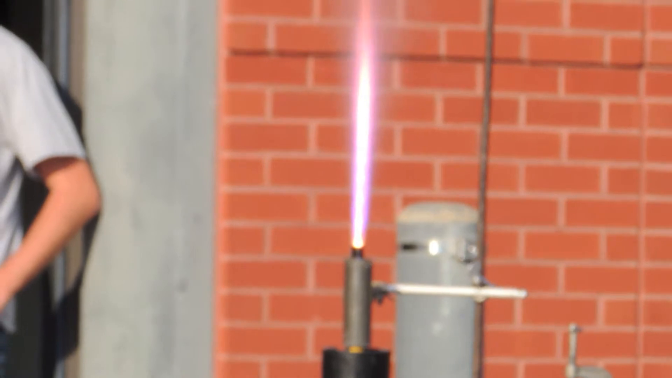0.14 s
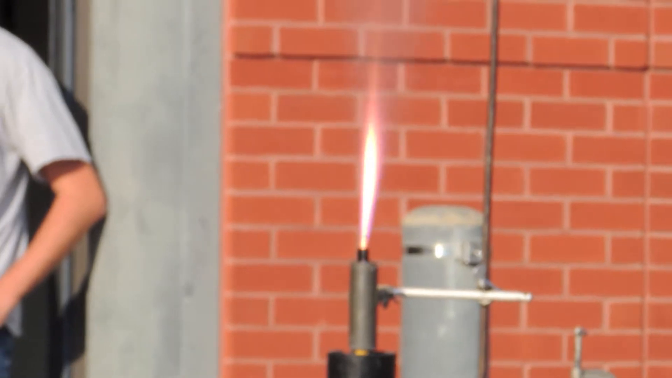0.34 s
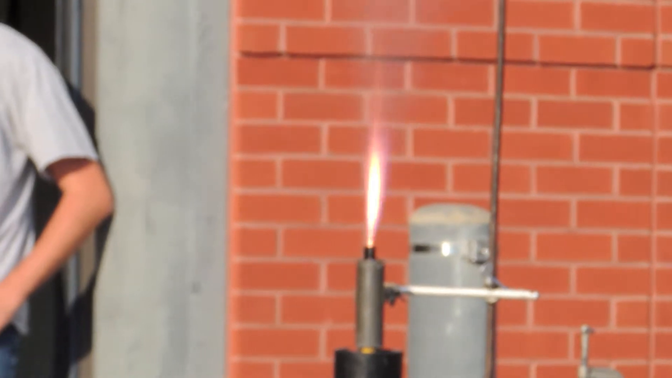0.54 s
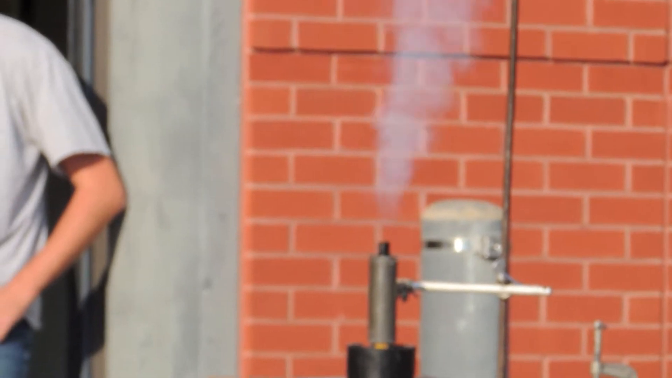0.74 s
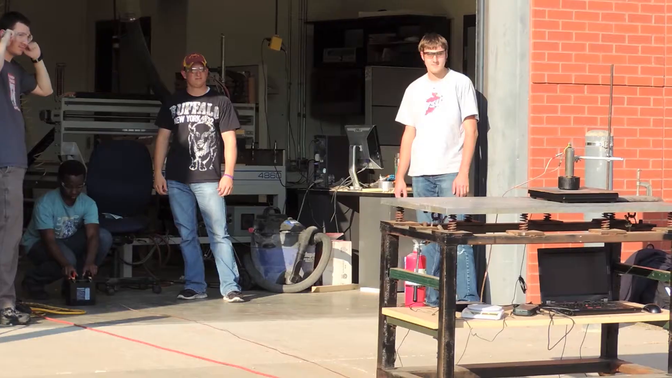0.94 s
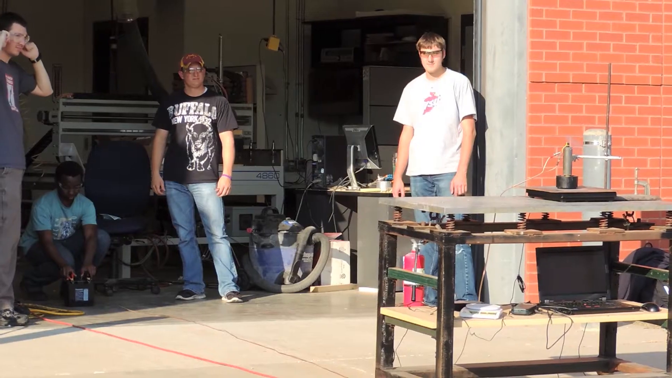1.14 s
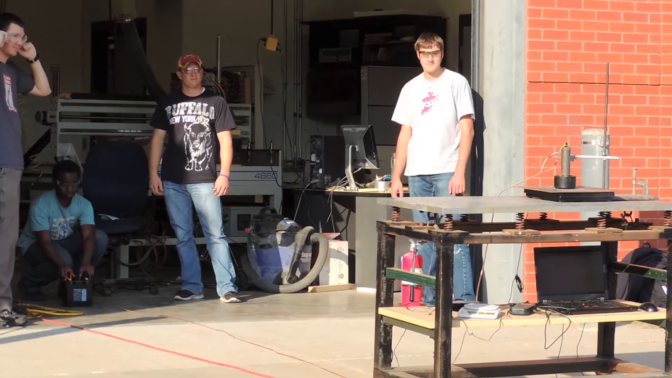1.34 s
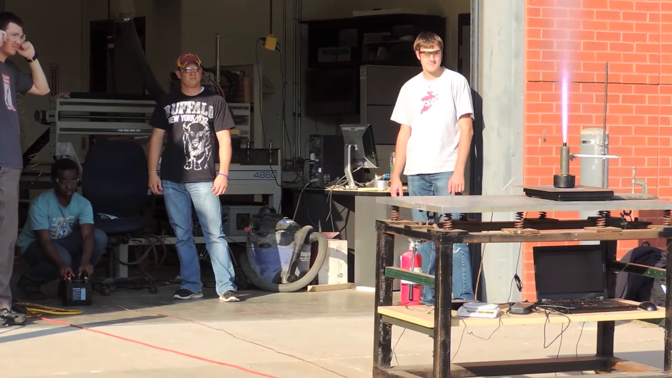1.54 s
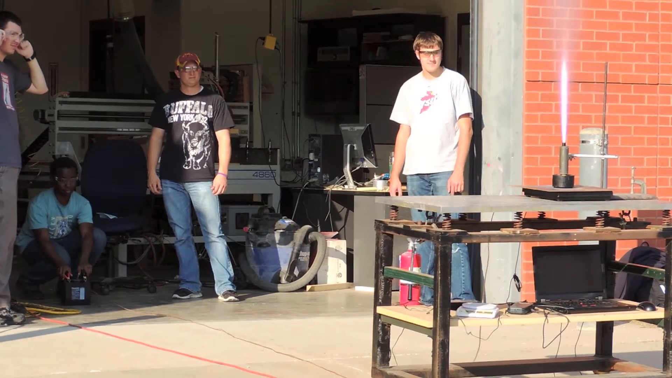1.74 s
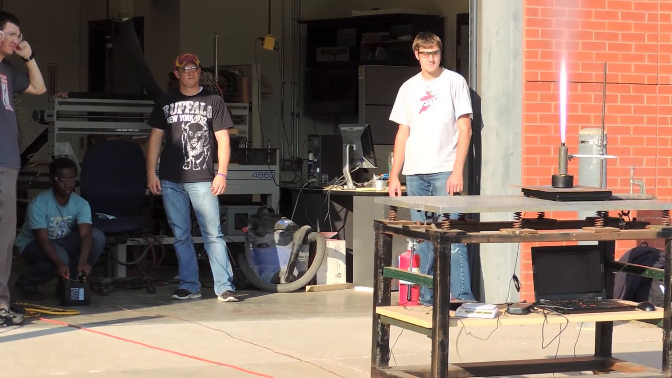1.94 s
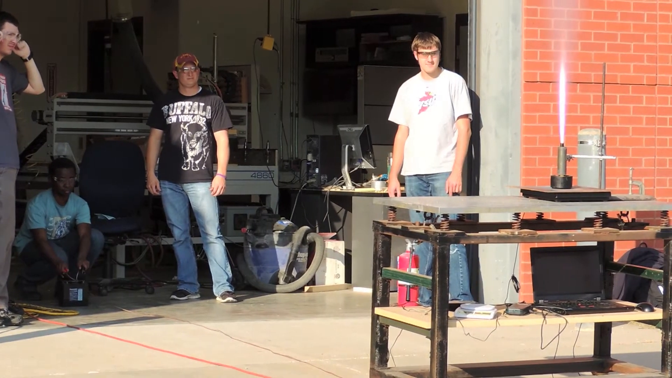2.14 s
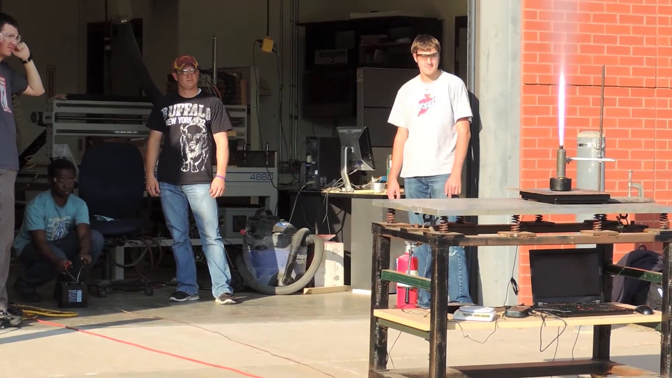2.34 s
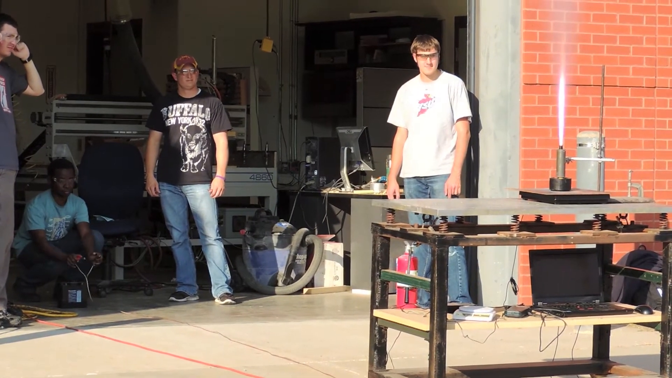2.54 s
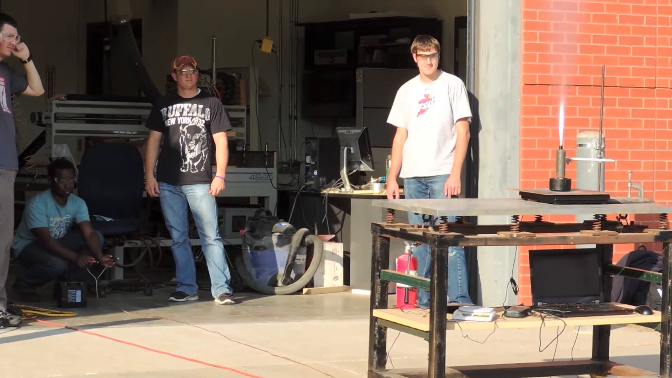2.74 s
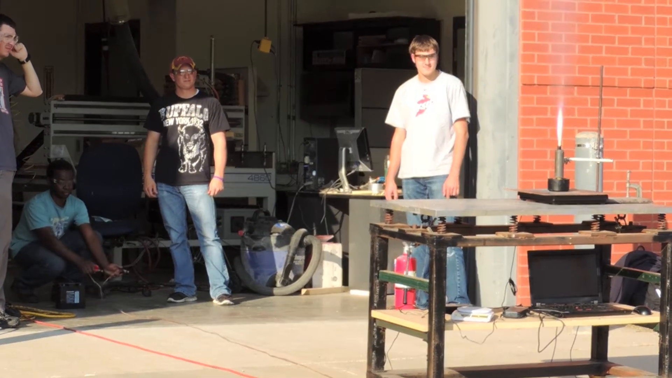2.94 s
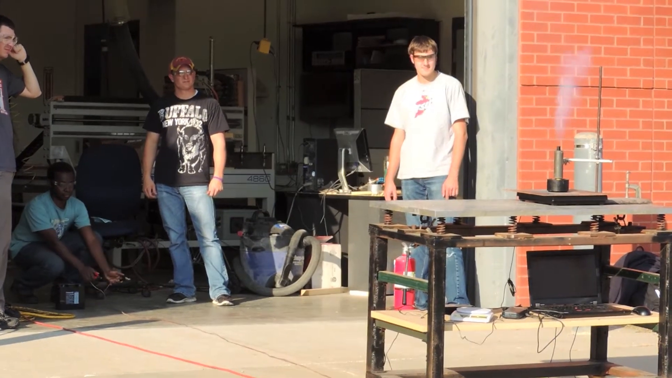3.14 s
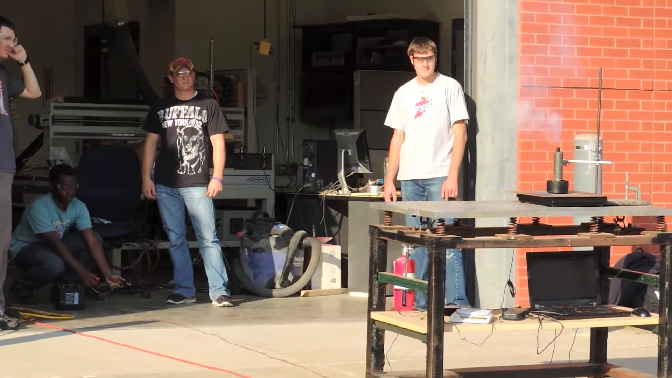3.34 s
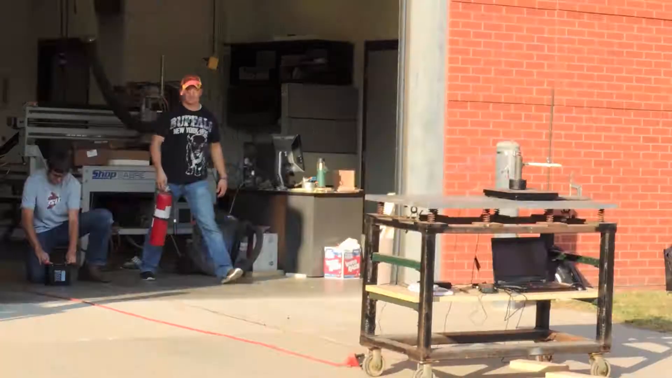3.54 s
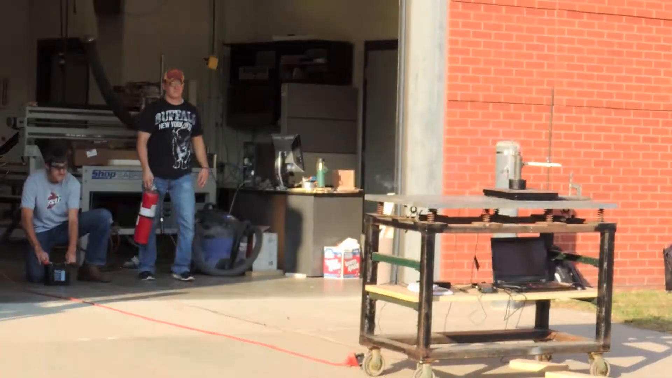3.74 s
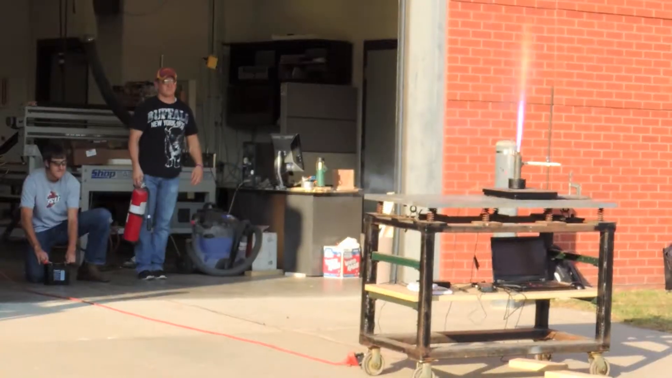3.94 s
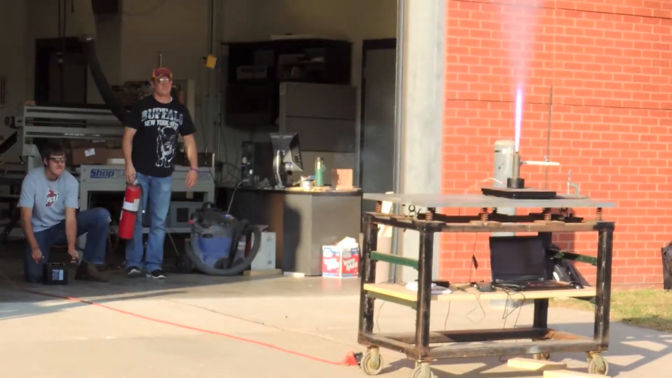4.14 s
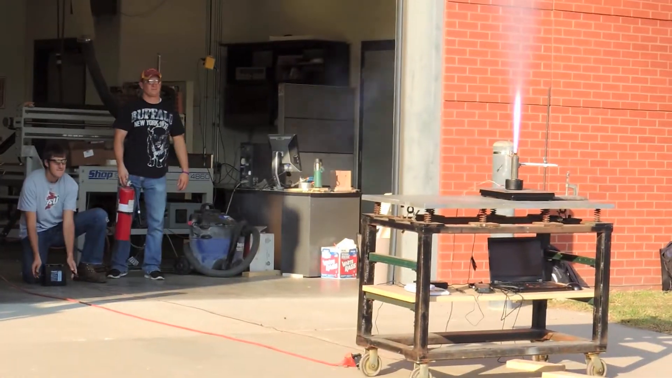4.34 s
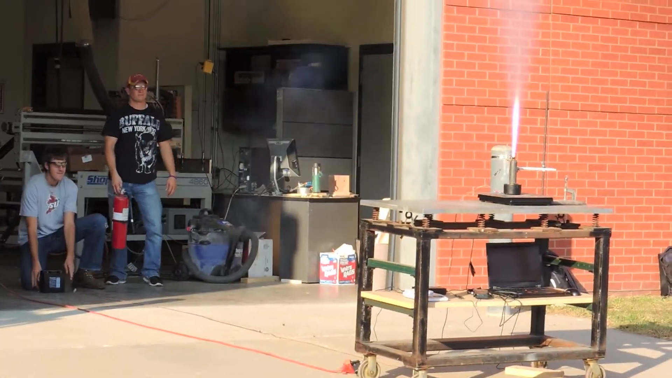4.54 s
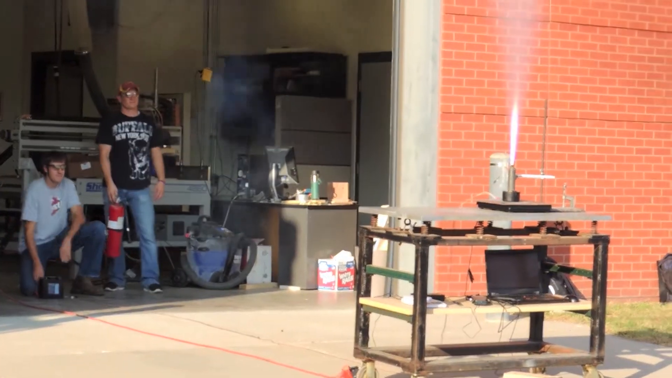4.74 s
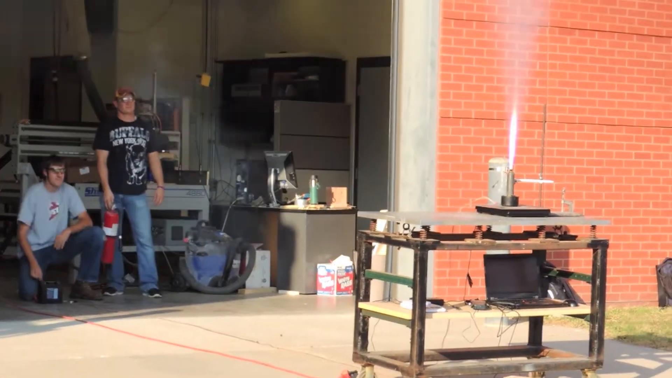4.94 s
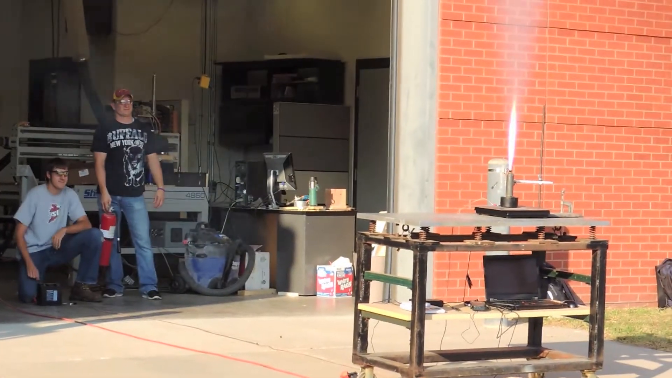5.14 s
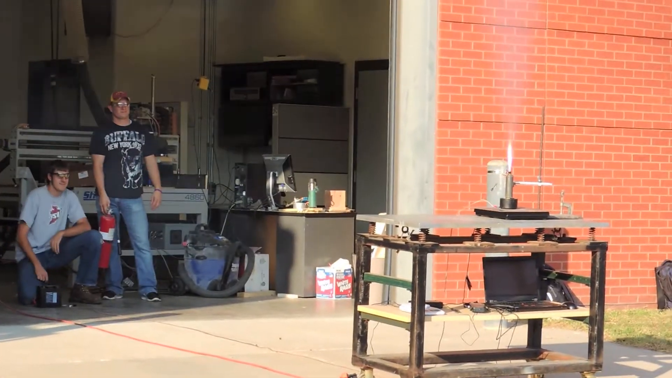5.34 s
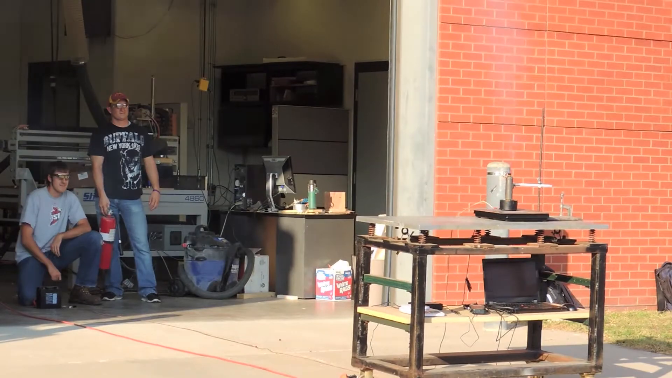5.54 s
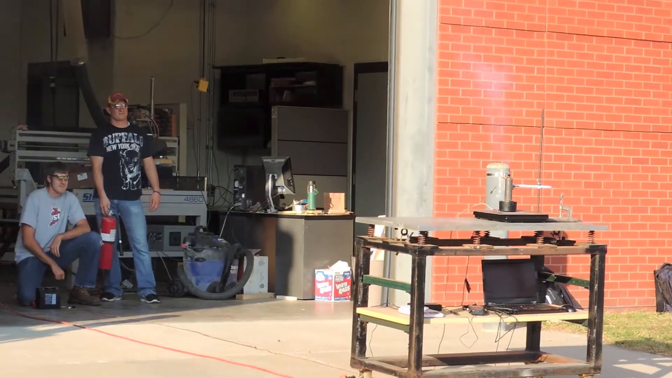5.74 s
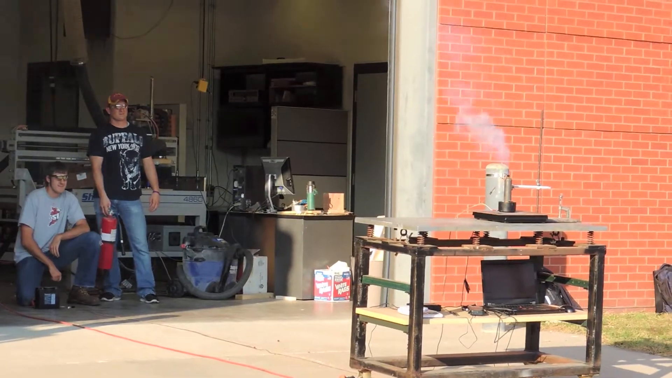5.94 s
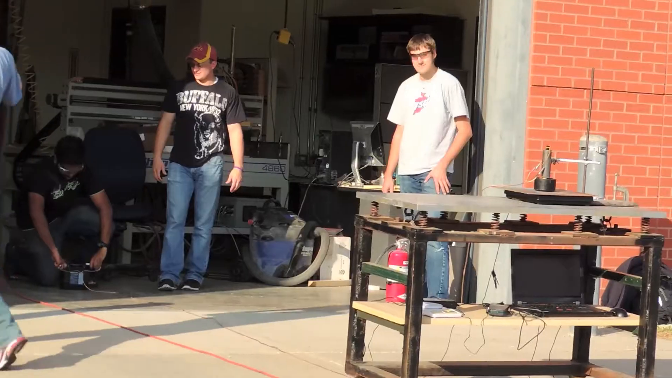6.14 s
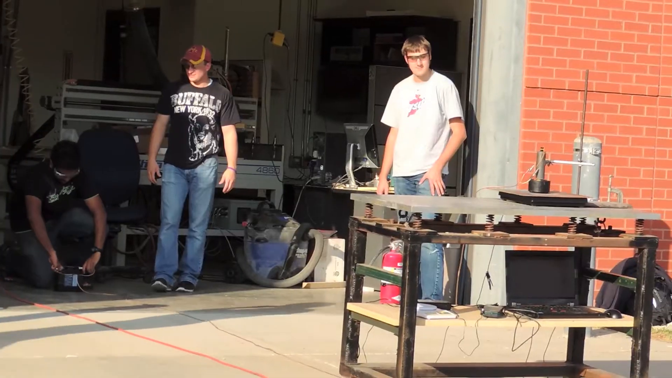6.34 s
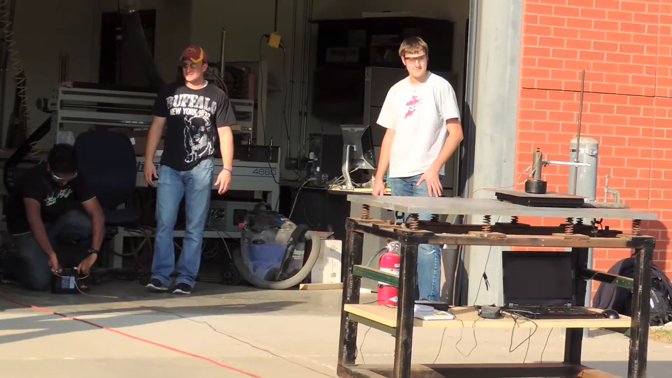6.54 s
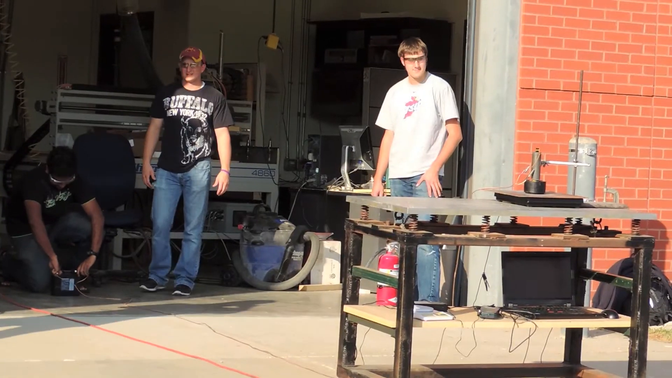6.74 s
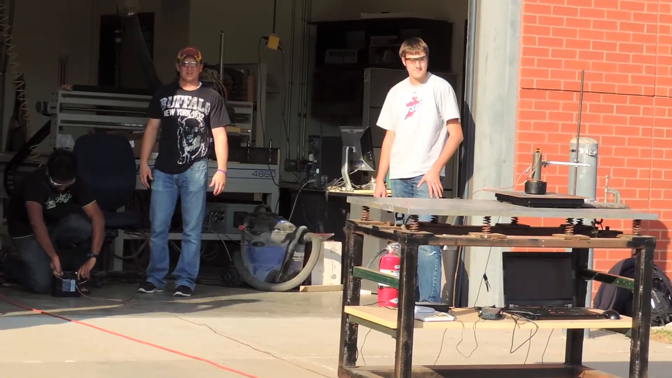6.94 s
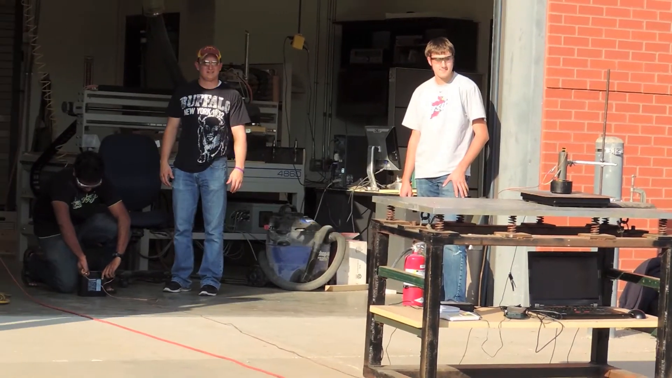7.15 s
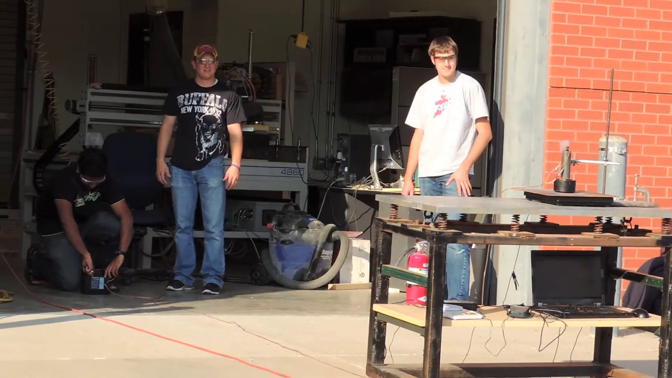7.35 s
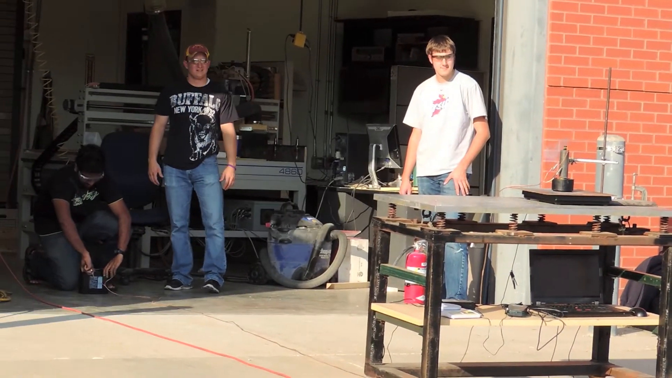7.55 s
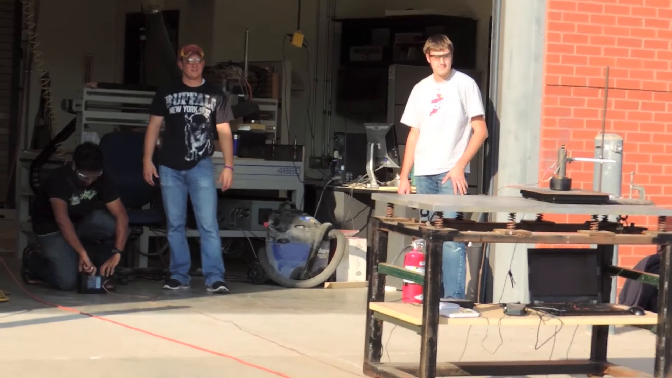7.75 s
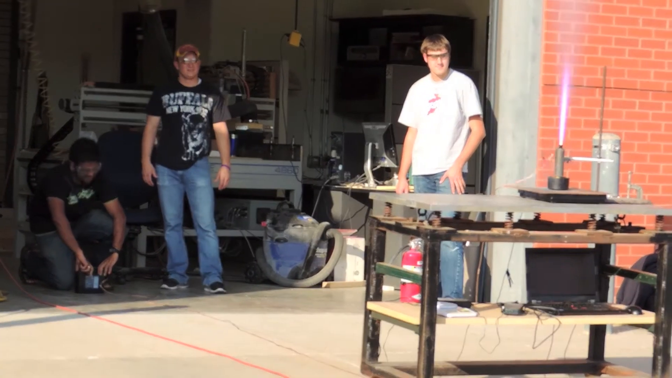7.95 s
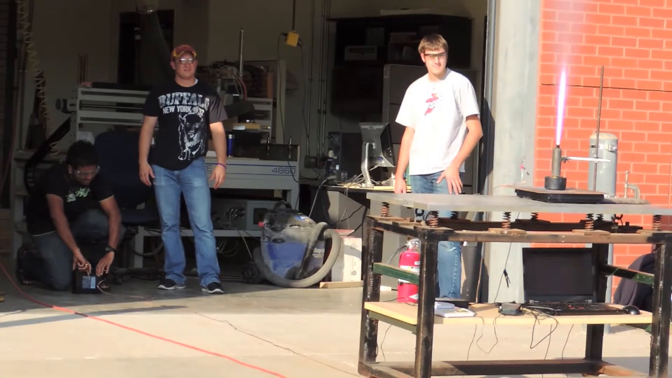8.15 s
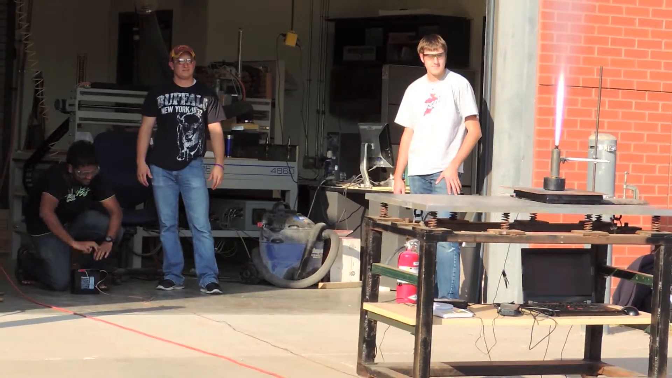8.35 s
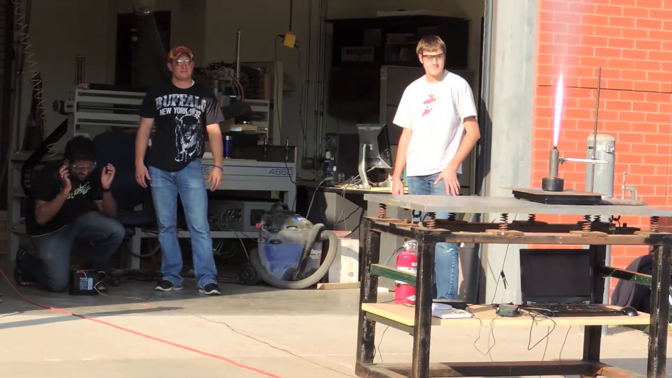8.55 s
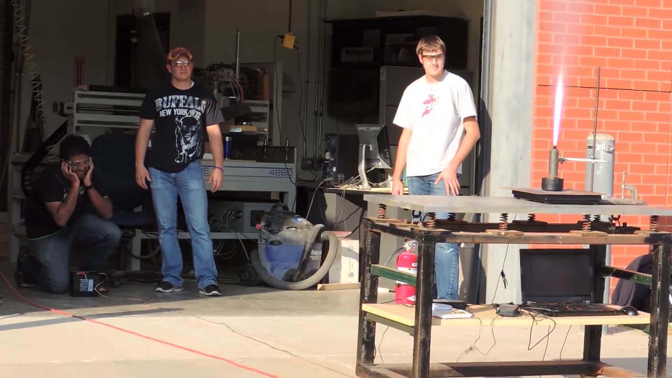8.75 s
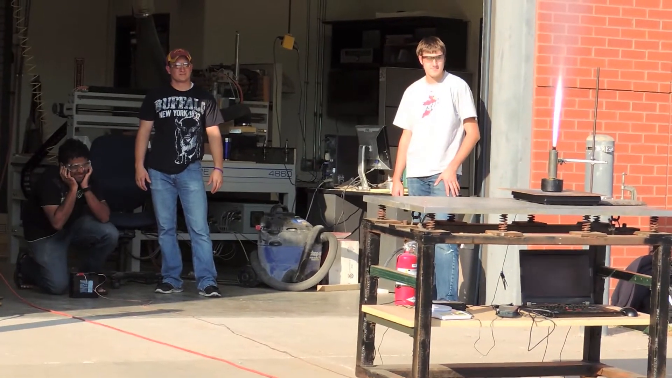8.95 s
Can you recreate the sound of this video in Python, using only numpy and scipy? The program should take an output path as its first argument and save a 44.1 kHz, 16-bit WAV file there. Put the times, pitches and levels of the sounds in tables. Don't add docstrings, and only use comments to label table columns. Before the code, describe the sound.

Outdoors in a paved yard, a burning rocket jet hisses, drops and chokes off. Three more motors follow in separate takes: quiet traffic and wind, a rising igniter hiss, a hard thump and clipped blast, then the microphone's automatic gain pulls it down to a steady bright hiss that tails off. A far engine surges before the last.

```python
import sys
import numpy as np
from scipy import signal
from scipy.fft import rfft, irfft, next_fast_len
from scipy.io import wavfile
from scipy.ndimage import uniform_filter1d

SR = 44100
rng = np.random.default_rng(int(sys.argv[2]) if len(sys.argv) > 2 else 0)


def unload_wav(signal):
    wavfile.write(
        sys.argv[1],
        SR,
        np.round(np.clip(np.atleast_2d(signal).T, -1, 1) * 32767).astype(np.int16),
    )


def convert_level_to_amplitude(level_db):
    exponent = np.asarray(level_db, float) / 20
    return 10 ** exponent


N = 396459

CUTS_S = [.872, 3.576, 6.079]
FADE_OUT_S, FADE_IN_S, FADE_POWER = .08, .05, 1.15

# level in dB before the gain control acts, during the burn, from tail-off on.
WIND_DB = [
    (-64, -72, -75),
    (-49.5, -52, -66),
    (-41.5, -65, -56),
    (-75, -60, -80),
]

# first and last traffic level in dB, first and last rumble in dB re traffic,
# far hiss in dB re traffic.
YARD_LEVELS = [
    (-48.5, -47.5, -1.5, 1.7, -5.5),
    (-48, -38.5, 7, -5.5, -10.5),
    (-46, -46.5, 1, 5.5, -8),
]
# low edge in Hz, high edge in Hz.
YARD_BANDS_HZ = [(400, 1800), (110, 300), (3500, 13000)]
# frequency in Hz, density in dB per Hz.
YARD_SPECTRA = [
    [(15, -24), (30, -0.5), (64, -5.5), (200, -7.5), (540, -16), (800, -14), (1400, -21.5), (2100, -28),
     (6000, -33), (14000, -38)],
    [(15, -42.5), (25, -2), (96, -1.5), (177, -10.5), (301, -15), (1730, -33), (2440, -38), (2640, -37.5),
     (14000, -50)],
    [(15, -39.5), (30, -12), (85, -7), (125, -12.5), (195, -20.5), (580, -25), (1000, -25.5), (1800, -31),
     (3070, -42.5), (14000, -54.5)],
]
# centre in Hz, width in Hz, gain in dB.
YARD_HUMS = [
    [],
    [],
    [(706, 69, 5.5), (860, 93, 8.5), (1270, 59, 7), (1690, 100, 6.5)],
]
# frequency in Hz, likeness 0-1.
YARD_LIKENESS = [(60, .95), (300, .9), (700, .8), (1500, .65), (3000, .35), (5000, .2), (14000, .3)]
# time in seconds, length in seconds, pitch in Hz, level in dB.
ENGINE_SURGES = [(6.16, .13, 84, -32), (6.25, .08, 84.5, -33), (6.38, .1, 84, -30), (6.56, .3, 85.2, -34.5),
                 (6.76, .07, 84, -34), (6.91, .2, 82.5, -32), (7.075, .1, 86.7, -33), (7.19, .2, 89, -42),
                 (7.33, .12, 77, -43), (7.445, .08, 85, -34), (7.58, .14, 79, -39), (7.74, .24, 86, -32),
                 (7.88, .12, 73, -37), (7.975, .1, 79, -29)]
IDLE_DB = -59

# start in seconds, peak in dB, centre in Hz,
# width in Hz, T60 in seconds.
TICK_EVENTS = [(6.487, -46, 5400, 2000, .03), (6.84, -35, 1250, 440, 0.063),
               (6.842, -36, 5700, 5000, 0.026), (7.8, -48, 3300, 1600, .05), (7.07, -54, 7000, 5000, 0.033),
               (7.35, -44, 3400, 2600, 0.04), (7.505, -45, 5900, 7700, 0.088), (1.13, -53, 2450, 200, .9),
               (.674, -27, 7600, 600, .05), (3.105, -25, 8400, 990, 0.046), (5.593, -21, 3160, 5200, .02),
               (5.583, -26, 1500, 2400, .02), (.285, -26, 950, 500, .05), (3.07, -36, 2100, 1800, .1),
               (6.841, -40, 3000, 4000, .02), (3.108, -32, 1600, 2000, 0.078),
               (4.066, 1, 2700, 5000, 0.024)]
# start in seconds, peak in dB, pitch in Hz, T60 in seconds.
THUMP_EVENTS = [(1.575, -2.5, 250, 0.011), (1.579, -11, 707, 0.037), (4.064, -10, 296, 0.0071),
                (7.983, -4.5, 248, 0.027), (7.986, -14, 700, .03), (.257, -22, 500, 0.013),
                (3.105, -38, 900, .03), (4.52, -34, 120, 0.027), (5.209, -38, 90, 0.047),
                (5.594, -34, 500, 0.0068), (5.671, -32, 497, 0.012)]

# catches in seconds, full flow in seconds.
IGNITER_TIMES_S = [
    (1.36, 1.558),
    (3.68, 4.014),
    (7.76, 7.958),
]
# hiss in dB, then top, whistle and roar in dB re hiss.
CATCH_LEVELS_DB = [(-57, -0.5, -0.5, -10), (-62, -9.5, -1.5, 15.5), (-63.5, -10, 6, 8)]
# hiss in dB, dB lost until the charge lights, then top, whistle and roar in dB re hiss.
FULL_LEVELS_DB = [(-16, -2, 2.5, -15.5, -25), (-16.5, 2.5, -5.5, -5.5, -6), (-22, -2.5, 0.5, -16.5, -27)]
# low edge in Hz, high edge in Hz.
IGNITER_BANDS_HZ = [(4500, 9000), (10000, 14000), (2900, 3900), (700, 2200)]
# frequency in Hz, density in dB per Hz.
IGNITER_SPECTRUM = [(300, -43.5), (800, -7.5), (2500, -2.5), (5000, -4.5), (8000, -2.5), (14000, 0)]
# centre in Hz, width in Hz, gain in dB.
IGNITER_PEAKS = [
    [(3406, 300, 5), (2800, 200, -9)],
    [(940, 160, 9), (3700, 220, 6), (2300, 260, -1.5), (2680, 250, 4), (4800, 300, -6), (5200, 300, 4),
     (5650, 300, -6)],
    [(3560, 490, 4.4), (7550, 400, 5.2), (2990, 150, -12), (4750, 200, -10), (5550, 400, -4)],
]
# delay in ms, share 0-1, blurred above in Hz.
IGNITER_ECHOES = [
    [(1.225, .55, 30200), (1.67, 0.13, 30700), (2.87, 0.13, 29700)],
    [(1.186, 0.74, 3500), (1.7, 0.16, 30000), (0.72, 0.15, 24000)],
    [(1.16, 0.51, 20000), (1.47, .2, 29600), (2.65, 0.13, 9800)],
]

# lights in seconds, tails off in seconds, burns out in seconds.
JET_TIMES_S = [
    (-1.3, .264, .678),
    (1.572, 2.735, 3.112),
    (4.063, 5.275, 5.666),
    (7.982, 9.5, 9.9),
]
# steady hiss in dB, tail hiss in dB, burst hold in seconds, gain pull-down in seconds,
# dB still to settle.
JET_LEVELS_DB_S = [(-22, -33, .2, .1, .1), (-22.5, -36, 0.23, 0.087, 1.6), (-22.5, -30.5, 0.19, 0.061, 2.5),
                   (-23, -34, .2, .13, 0)]
# top, roar and tail roar in dB re hiss, sag in dB per second, last swell of the tail in dB.
JET_VOICES_DB = [(-2, -7.5, -7.5, 0.6, -1.7), (0.5, -9, -6.5, 0.5, 2.5), (-1.06, -9.5, -12.5, 0.8, 4.5),
                 (0.9, -6.5, -8, 5, .1)]
JET_RUMBLES_DB = [-37, -30, -33, -31]
# low edge in Hz, high edge in Hz.
JET_BANDS_HZ = [(5000, 9500), (10500, 14000), (600, 3300), (30, 250)]
# frequency in Hz, density in dB per Hz.
JET_SPECTRUM = [(18, -43), (30, -12), (110, -17), (350, -17), (600, -17), (1000, -13), (2000, -11),
                (2800, -6.5), (4500, -7), (5600, -4.5), (6600, -1.5), (8000, -3), (10000, -7),
                (14000, -7.5)]
# centre in Hz, width in Hz, gain in dB.
JET_PEAKS = [
    [(835, 110, 1), (7300, 760, 0.5)],
    [(1675, 110, 5.5), (2640, 260, 3), (900, 130, 3.5)],
    [(6560, 160, 1), (1774, 77, 5.5), (1286, 110, 3.5)],
    [(1720, 110, 5.5), (2820, 250, -0.5), (4780, 150, -0.5)],
]
# delay in ms, share 0-1, blurred above in Hz by the plume length.
JET_ECHOES = [
    [(1.19, 0.35, 1700), (2.87, 0.084, 4130), (3.45, 0.065, 3940)],
    [(1.3, 0.22, 6130), (1.5, 0.033, 4000), (1.9, 0.027, 8970)],
    [(1.3, 0.15, 7200), (2.35, 0.29, 2400), (1.2, 0.18, 15000)],
    [(1.18, 0.099, 2700), (.73, 0.093, 7200), (1.5, 0.033, 2000)],
]
# frequency in Hz, likeness 0-1.
JET_LIKENESS = [(60, .35), (130, .45), (290, .6), (640, .87), (1400, .87), (3080, .8), (5000, .62),
                (7000, .72), (14900, .72)]
# frequency in Hz, left minus right in dB.
JET_BALANCE = [(60, 4.0), (110, 4.0), (200, 2.5), (380, 2.0), (700, 1.0), (1280, 1.5), (2370, 0.0),
               (4370, 0.5), (8060, -1.0), (14900, 3.0)]
# level in dB re last hiss, T60 in
# seconds.
AFTERSOUND = [
    (-18.5, 2.2),
    (-27, 1.2),
    (-21.5, 6),
    (-32.5, 17),
]
BURST_DB, BURST_SAG_DB, ATTACK_S, SETTLE_S = -3.5, 5, .009, .32
TAIL_OFF_S, CHOKE_DB, QUICK_T60_S = .13, 7, .35
BOOM_DB, BOOM_T60_S = -8, .17

JET_LEAD_MS, YARD_LEAD_MS = -.009, .113
WORKSHOP_DB, WORKSHOP_T60_S, WORKSHOP_FROM_HZ = -11.5, .12, 2500


def at_hz(points, hz):
    f, value = np.transpose(points)
    return np.interp(np.log(hz + 20), np.log(f + 20), value)


def drift(size, rate_hz):
    r = np.exp(-2 * np.pi * rate_hz / SR)
    slow = signal.lfilter([1], [1, -2 * r, r * r], rng.standard_normal(size + 8000))[8000:]
    return slow / slow.std()


def power_sum(*db):
    return 10 * np.log10(sum(convert_level_to_amplitude(d) ** 2 for d in db))


def add(out, start_s, part):
    i = round(start_s * SR)
    out[:, i:i + part.shape[1]] += part[:, :N - i]


def echo_paths(hz, padded, echoes):
    paths = 1
    for ms, share, blur_hz in echoes:
        paths = paths + share * np.exp(-(hz / blur_hz) ** 2 - 2j * np.pi * hz * ms / 1000)
    scatter = rng.standard_normal(4096) * convert_level_to_amplitude(-60 * np.arange(4096) / SR / WORKSHOP_T60_S)
    scatter = rfft(scatter / np.linalg.norm(scatter), padded)
    return paths + convert_level_to_amplitude(WORKSHOP_DB) * scatter * np.minimum(hz / WORKSHOP_FROM_HZ, 1)


def flow(rows, bands_hz, spectrum, peaks, echoes, likeness, lead_ms, balance, flicker_db, flicker_hz):
    s, level, *shares = np.transpose(rows)
    size = round((s[-1] - s[0]) * SR)
    padded = next_fast_len(size + 4096)
    hz = np.arange(padded // 2 + 1) * SR / padded
    ringing = sum(db / (1 + (2 * (hz - centre) / width) ** 2) for centre, width, db in peaks)
    shape = convert_level_to_amplitude(at_hz(spectrum, hz) + ringing) * echo_paths(hz, padded, echoes)

    mid, side = rfft(rng.standard_normal((2, padded))) / np.sqrt(2)
    alike = np.clip(at_hz(likeness, hz), 0, .99)
    sign = np.array([[1], [-1]])
    ports = convert_level_to_amplitude(sign * at_hz(balance, hz) / 2) * np.exp(1j * np.pi * sign * hz * lead_ms / 1000)
    stereo = shape * ports * (np.sqrt(1 + alike) * mid + sign * np.sqrt(1 - alike) * side)

    centres = np.log([np.sqrt(low * high) for low, high in bands_hz])
    rank = np.argsort(centres)
    t = s[0] + np.arange(size) / SR
    gusts = drift(size, flicker_hz)
    out = 0
    for k, (low, high) in enumerate(bands_hz):
        weight = np.interp(np.log(hz + 1), centres[rank], (rank == k) * 1.)
        inside = (hz > low) & (hz < high)
        rms = np.sqrt(np.sum(abs(shape[inside]) ** 2 * (1 + alike[inside])) / padded)
        db = np.interp(t, s, level + (shares[k - 1] if k else 0))
        db = db + flicker_db * (gusts + drift(size, flicker_hz))
        out = out + convert_level_to_amplitude(db) / rms * irfft(stereo * weight, padded)[:, :size]
    edge = np.minimum(np.arange(size), np.arange(size)[::-1]) / (.003 * SR)
    uncut = (s[0] == 0) * (t < .1) + (t > 8.9)
    return out * np.minimum(edge + uncut, 1)


def wind():
    t, level_db = np.arange(N) / SR, np.zeros(N)
    for start, times, levels, take_db in zip([0] + CUTS_S, JET_TIMES_S, JET_LEVELS_DB_S, WIND_DB):
        lit, tails, _ = times
        *_, hold, pull, _ = levels
        before, during, after = take_db
        steps = [lit + hold, lit + hold + pull, tails - .2, tails]
        level_db[t >= start] = np.interp(t[t >= start], steps, [before, during, during, after])
    band = signal.butter(2, [25, 85], "band", fs=SR, output="sos")
    shared, left, right = signal.sosfilt(band, rng.standard_normal((3, N)))
    return convert_level_to_amplitude(level_db + 2. * drift(N, 4)) * (shared + .55 * np.array([left, right])) / shared.std()


def engine(out):
    s, length_s, hz, db = np.transpose(ENGINE_SURGES)
    t = np.arange(CUTS_S[-1], JET_TIMES_S[-1][0], 1 / SR)
    pitch_hz = np.interp(t, s, hz) * (1 + .0226 * drift(len(t), 10.5))
    level = convert_level_to_amplitude(IDLE_DB)
    for a, b, d in zip(s, length_s, db):
        level = level + convert_level_to_amplitude(d) * np.cos(np.pi * np.clip((t - a) / b, -.5, .5))
    throb = level * convert_level_to_amplitude(2. * drift(len(t), 14)) * signal.windows.tukey(len(t), .02)
    drone = np.sqrt(2) * throb * np.sin(2 * np.pi * np.cumsum(pitch_hz) / SR)
    add(out, t[0], drone * convert_level_to_amplitude([[.3], [-.3]]))


def yard():
    out = np.zeros((2, N))
    waits = zip(YARD_LEVELS, CUTS_S, JET_TIMES_S[1:], YARD_SPECTRA, YARD_HUMS)
    for (first, last, low_first, low_last, hiss), cut, motor, spectrum, hums in waits:
        rows = [(cut, first, low_first, hiss), (motor[0], last, low_last, hiss - (last - first) / 2)]
        add(out, cut, flow(rows, YARD_BANDS_HZ, spectrum, hums, [], YARD_LIKENESS, YARD_LEAD_MS,
                           [(50, .46), (9000, 1.2)], .88, 9))
    engine(out)
    return out


def ticks():
    out, t = np.zeros((2, N)), np.arange(8000) / SR
    fade = np.hanning(2 * len(t))[len(t):]
    for s, db, hz, width, t60 in TICK_EVENTS:
        band = signal.butter(2, [hz - width / 2, hz + width / 2], "band", fs=SR, output="sos")
        burst = signal.sosfilt(band, rng.standard_normal(len(t)))
        burst = burst / burst.std() * convert_level_to_amplitude(db - 2.0 - 60 * t / t60) * fade
        add(out, s, burst * convert_level_to_amplitude([[.6], [-.6]]))
    return out


def thumps():
    out, t = np.zeros((2, N)), np.arange(6000) / SR
    for s, db, hz, t60 in THUMP_EVENTS:
        push = -np.sin(2 * np.pi * hz * t) * convert_level_to_amplitude(-60 * t / t60)
        push = push + .5 * np.pad(push, (51, 0))[:len(t)]
        low = signal.butter(2, 2.0 * hz, fs=SR, output="sos")
        puff = signal.sosfilt(low, rng.standard_normal((2, len(t)))) * convert_level_to_amplitude(-60 * t / (2.5 * t60))
        add(out, s, convert_level_to_amplitude(db) * (push + 1.2 * puff))
    return out


def igniters():
    out = np.zeros((2, N))
    firings = zip(IGNITER_TIMES_S, CATCH_LEVELS_DB, FULL_LEVELS_DB, JET_TIMES_S[1:],
                  IGNITER_PEAKS, IGNITER_ECHOES)
    for (s, full), catch, (db, loss, *voice), motor, peaks, echoes in firings:
        rows = [(s, *catch), (full, db, *voice), (motor[0] + .0036, db - loss, *voice)]
        add(out, s, flow(rows, IGNITER_BANDS_HZ, IGNITER_SPECTRUM, peaks, echoes, JET_LIKENESS,
                         JET_LEAD_MS, JET_BALANCE, .42, 25))
    return out


def burn(motor, levels, voice, rumble_db, end_s):
    lit, tails, burnout = motor
    steady_db, tail_db, hold, pull, settle_db = levels
    top, roar, tail_roar, sag, swell = voice
    t = np.arange(max(lit, 0), end_s, .002)
    held = lit + hold + pull
    hiss = np.interp(t, [lit, lit + ATTACK_S, lit + hold, held, held + SETTLE_S, tails, tails + TAIL_OFF_S, burnout],
                     [BURST_DB - 9.5, BURST_DB, BURST_DB - BURST_SAG_DB, steady_db + settle_db, steady_db,
                      steady_db - sag * (tails - held), tail_db, tail_db + swell])
    roars = np.interp(t, [tails, tails + TAIL_OFF_S], [roar, tail_roar])
    rumble = power_sum(rumble_db, BOOM_DB - 60 * (t - lit) / BOOM_T60_S)
    since = np.maximum(t - burnout, 0)
    direct = -np.minimum(since / .0055, 1) * CHOKE_DB - 60 * since / QUICK_T60_S
    bands = []
    for share, (db, t60) in zip([0, top, roars, rumble], AFTERSOUND):
        lingering = db - 60 * since / t60 - 30 * (since == 0)
        bands.append(hiss + power_sum(share + direct, lingering))
    return np.transpose([t, bands[0]] + [b - bands[0] for b in bands[1:]])


def jets():
    out = np.zeros((2, N))
    firings = zip(JET_TIMES_S, JET_LEVELS_DB_S, JET_VOICES_DB, JET_RUMBLES_DB, CUTS_S + [N / SR],
                  JET_PEAKS, JET_ECHOES)
    for motor, levels, voice, rumble_db, end_s, peaks, echoes in firings:
        rows = burn(motor, levels, voice, rumble_db, end_s)
        add(out, rows[0][0], flow(rows, JET_BANDS_HZ, JET_SPECTRUM, peaks, echoes, JET_LIKENESS,
                                  JET_LEAD_MS, JET_BALANCE, .63, 11))
    return out - .055 * (out ** 2 - uniform_filter1d(out ** 2, size=100))


def scene():
    return wind() + yard() + ticks() + thumps() + igniters() + jets()


def low_pass(x):
    return signal.sosfilt(signal.butter(12, 15470, fs=SR, output="sos"), x)


def record(dry):
    t = np.arange(N) / SR
    fades = 1
    for s in CUTS_S:
        ramp = np.maximum((s - t) / FADE_OUT_S, (t - s) / FADE_IN_S)
        fades = fades * np.clip(ramp, 0, 1) ** FADE_POWER
    overloaded = np.clip(dry, -.9, .9)
    coupling = signal.butter(1, 18, "high", fs=SR, output="sos")
    top_cut = signal.ellip(12, .1, 50, 14170, fs=SR, output="sos")
    mix = signal.sosfiltfilt(top_cut, signal.sosfilt(coupling, fades * overloaded))
    return low_pass(mix)


dry = scene()
out = record(dry)
unload_wav(out)
```